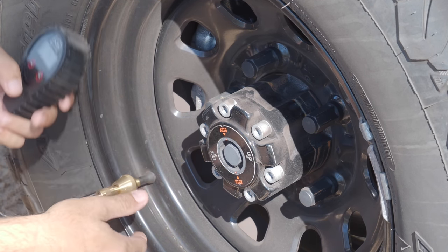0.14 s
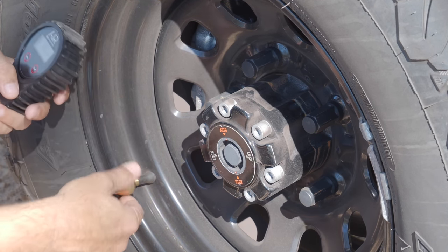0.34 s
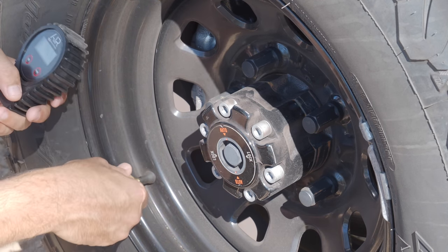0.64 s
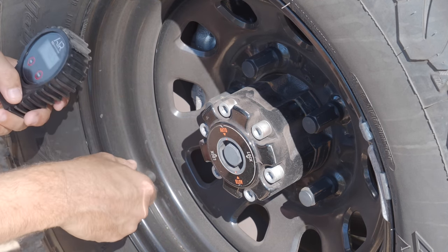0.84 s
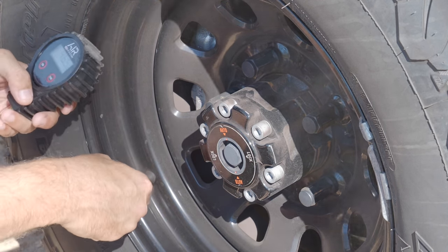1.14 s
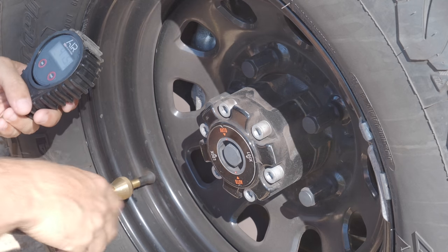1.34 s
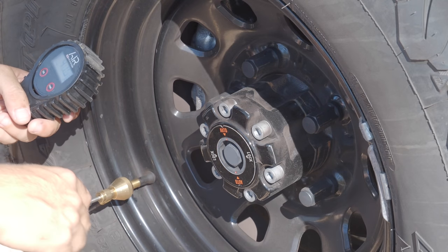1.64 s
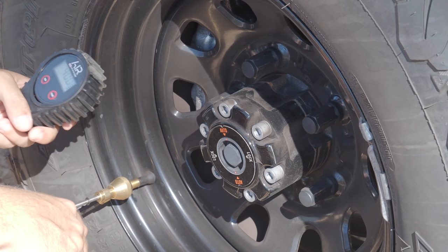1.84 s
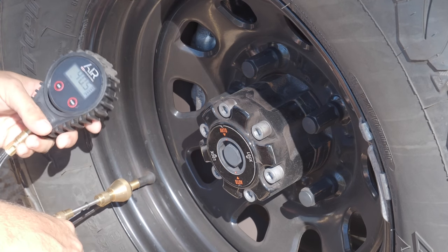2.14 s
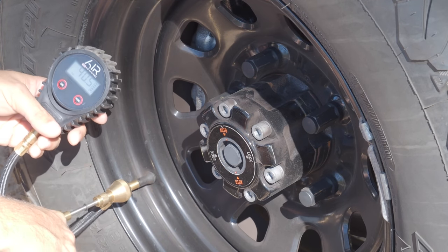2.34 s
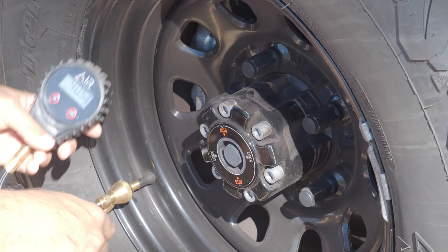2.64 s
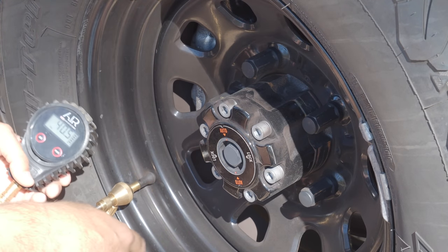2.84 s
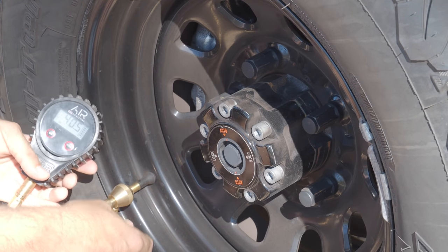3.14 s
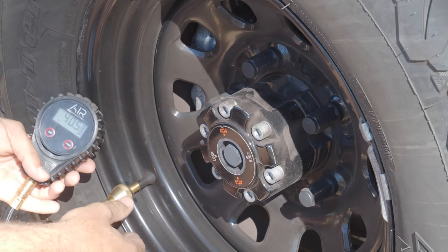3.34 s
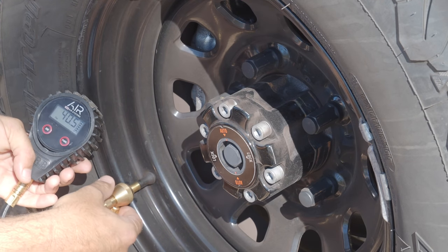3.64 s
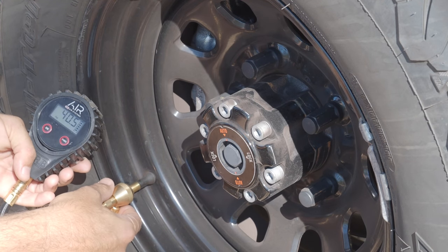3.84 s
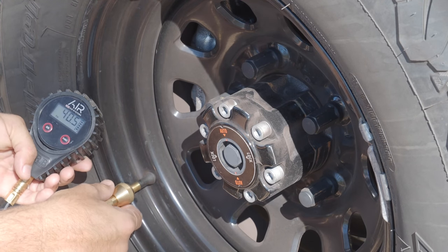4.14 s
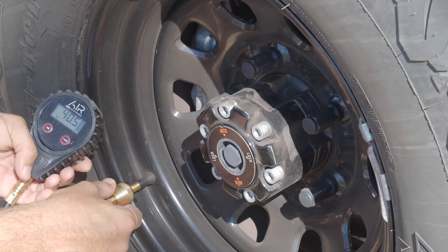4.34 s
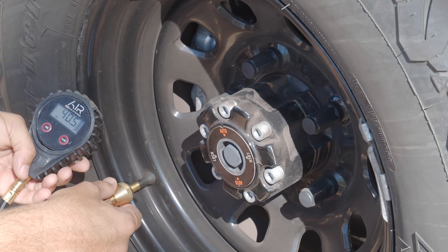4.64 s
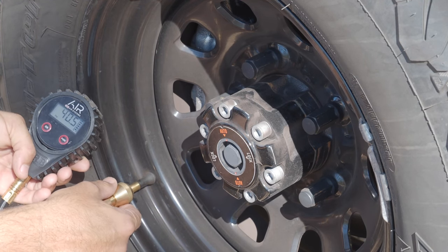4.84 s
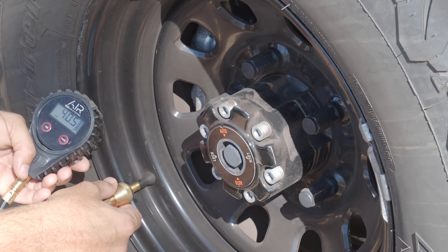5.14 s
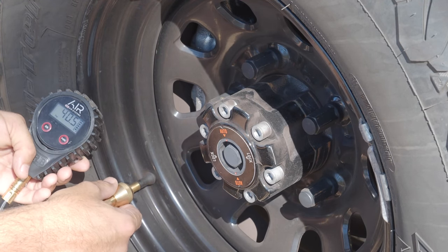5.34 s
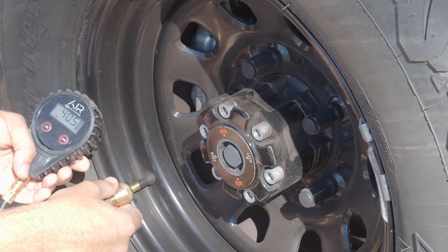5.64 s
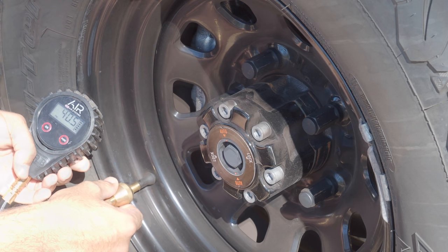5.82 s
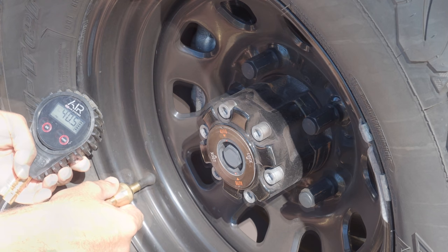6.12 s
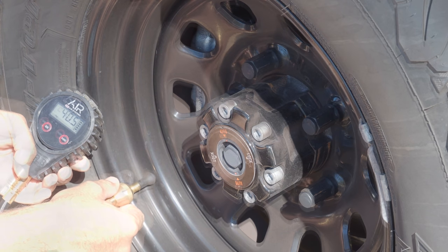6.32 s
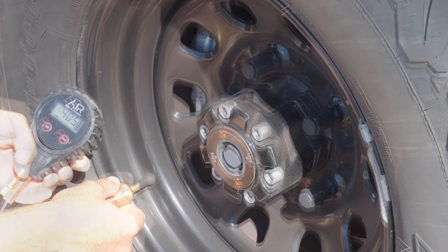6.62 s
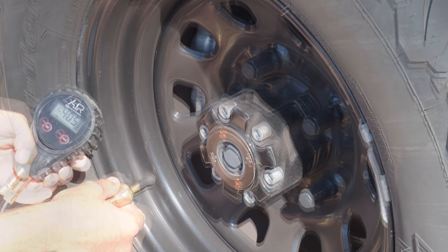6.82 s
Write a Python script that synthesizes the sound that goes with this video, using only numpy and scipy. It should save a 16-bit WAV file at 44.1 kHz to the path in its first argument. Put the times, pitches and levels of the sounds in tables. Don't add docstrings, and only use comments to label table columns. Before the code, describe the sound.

Fingers rub and click on a brass tyre valve fitting, then it pops open into a loud, steady, bright hiss of escaping air.

```python
import sys
import numpy as np
from scipy import signal
from scipy.io import wavfile
from scipy.ndimage import uniform_filter1d

SR = 44100
rng = np.random.default_rng(int(sys.argv[2]) if len(sys.argv) > 2 else 0)


def log_audio(samples):
    frames = np.atleast_2d(samples).T
    limited = np.clip(frames, -1, 1)
    pcm = np.round(limited * 32767).astype(np.int16)
    wavfile.write(sys.argv[1], SR, pcm)


def gain_from_db(level_db):
    decades = np.asarray(level_db, float) / 20
    return 10 ** decades


N = 307818


def evened(x):
    return x / np.sqrt(np.mean(x ** 2) + 1e-20)


def smooth_noise(count, size, passes=1):
    x = rng.standard_normal(count)
    for _ in range(passes):
        x = uniform_filter1d(x, size)
    return evened(x)


def read(points, hz):
    f, level_db = np.transpose(points)
    return np.interp(np.log(hz + 1), np.log(f + 1), level_db)


def add(mix, s, sound):
    part = mix[round(s * SR):][:len(sound)]
    part += sound[:len(part)]


def noise(db_of, size):
    s = np.arange(4 * N // size + 5) * size / 4 / SR
    hz = np.fft.rfftfreq(size, 1 / SR)[:, None]
    real, imaginary = rng.standard_normal((len(s), len(hz), 2)).T
    spectra = (real + 1j * imaginary) * gain_from_db(db_of(hz, s))
    return evened(signal.istft(spectra, nperseg=size, noverlap=3 * size // 4)[1][:N])


def patches(hz, s, bins, frames):
    field = rng.standard_normal((len(s), len(hz))).T
    return evened(uniform_filter1d(uniform_filter1d(field, bins, 0), frames, 1))


# t/s, jet level/dB, shading by the fingers/dB
AIR_FLOW = [(.985, -17.5, 0), (1.01, -16, -5), (1.05, -16.5, 0), (1.09, -14.5, -1.5), (1.16, -16.5, 1),
            (1.23, -16, -4.5), (1.3, -15, -1.5), (1.93, -15, -1.2), (2.15, -15, -1), (3.2, -15, -0.2),
            (3.7, -16, 0.5), (3.98, -17, 0.5), (4.17, -16, 0), (4.97, -15.5, -1), (5.13, -17.5, -1.1),
            (5.4, -16.1, 0.4), (6.09, -16, -0.1), (6.98, -19, 0.6)]
OPEN_S = .9468


def jet():
    t = np.arange(N) / SR
    at, level_db, _ = np.transpose(AIR_FLOW)
    rise_s, pop_db, pop_s = .013, 4, 0.022
    flutter_db = 0.48 * smooth_noise(N, 40)
    opening = np.clip((t - OPEN_S) / rise_s, 0, 1) ** 0.7
    rush_db = pop_db * np.exp(-(np.maximum(t - OPEN_S, 0) / pop_s) ** 2 / 2)
    hiss = noise(jet_colour, size=512)
    hiss = hiss * opening * gain_from_db(flutter_db + rush_db + np.interp(t, at, level_db))
    echo_s, echo_db = 0.0012, -50
    return hiss + gain_from_db(echo_db) * np.roll(hiss, round(echo_s * SR))


# f/Hz, level per Hz/dB
FREE_JET = [(250, -24.5), (500, -22), (1000, -16.5), (2000, -9), (3200, -6.5), (5500, -3.5), (8000, 0.5),
            (11000, 1), (13500, -0.5), (15000, 0), (15800, -6)]
# f/Hz, width/Hz, level/dB
VENT_RESONANCES = [(470, 374, 6.5), (836, 87, 4.5), (2300, 870, 3.5), (3330, 160, 2.5), (3810, 800, 4.5),
                   (4450, 870, 9), (6270, 130, 4.5), (11700, 190, -2.5), (12810, 190, -1), (13770, 110, -3),
                   (14500, 210, -4.5), (14740, 170, 0), (15070, 950, 0.5)]
# f/Hz, width/Hz, level/dB in grips one, two, three, four
HAND_HOLLOWS = [(1277, 760, 13, 10, 9, 9.0), (5280, 1100, 3.5, 3, 0.6, 0.6),
                (5900, 340, 7.5, -0.5, 1.5, 3.2), (7670, 520, 4, -1.1, -2, -3.5),
                (8080, 670, 1.5, 3.5, 0.8, 4), (8860, 620, 0.5, -2.0, -3, -2.5),
                (9180, 380, 5, 5.3, 5, 3.0), (9550, 300, -4, -3.0, 7, 6), (9770, 470, -2.2, -2.3, -7.5, -7),
                (10380, 650, -4, -1, -0.2, 3.4), (10660, 460, -0.6, -3, -4.5, -5.5),
                (11300, 220, 2, -1.9, -1.9, 1), (13200, 330, 6, 3, -1, 4.0), (14000, 180, 2.8, 0, 2.5, 5)]
GRIP_CHANGES = [
    1.26,
    2.56,
    3.48,
]


def jet_colour(hz, s):
    move_s = 0.15
    moved = [np.clip((s - g) / move_s + .5, 0, 1) for g in GRIP_CHANGES]
    grips = -np.diff([np.ones_like(s), *moved, 0 * s], axis=0)
    resonances_db = lift(hz, VENT_RESONANCES) + lift(hz, HAND_HOLLOWS) @ grips
    steep = -3 * np.log2(np.maximum(250 / (hz + 1), 1))
    eddies = 0.49 * patches(hz, s, bins=6, frames=24) + 0.12 * patches(hz, s, bins=90, frames=3)
    surge = 0.26 * patches(hz, s, bins=60, frames=45)
    return read(FREE_JET, hz) + steep + resonances_db + shading(hz, s) + eddies + surge


def lift(hz, rows):
    rows = np.array(rows)
    centre, width = rows[:, 0], rows[:, 1]
    return (1 / (1 + (2 * (hz - centre) / width) ** 2)) @ rows[:, 2:]


def shading(hz, s):
    at, level_db, shade_db = np.transpose(AIR_FLOW)
    sag_db = 3 * np.maximum(at - 5.6, 0)
    swing_db = level_db + 15.5 + sag_db

    def region(offset_db, shaded, resists):
        return np.interp(s, at, offset_db + shaded * shade_db - resists * swing_db)

    low = region(-1.6, 0.48, 0.58) / (1 + (hz / 2800) ** 6)
    vent = region(-.1, .95, 0.18) / (1 + abs((hz - 4300) / 800) ** 4)
    palm = region(-1, .45, 0.12) / (1 + abs((hz - 7000) / 1900) ** 4)
    return low + vent + palm


# f/Hz, level per Hz/dB
SKIN_COLOUR = [(470, -32), (800, -10), (2470, -9), (2660, -9), (5140, -10), (6040, -9), (7010, -10),
               (15500, -13)]
# middle t/s, half length/s, level/dB, top f/Hz
STROKES = [(.1, .04, -66, 5000), (.15, 0.06, -57, 6000), (.22, .05, -63, 5000), (.3, 0.088, -64, 5000),
           (.367, 0.033, -55, 7000), (.455, 0.019, -58, 7000), (.54, 0.04, -57, 12000),
           (.598, 0.027, -59, 12000), (.73, 0.055, -54, 5000), (.79, 0.044, -62, 9000),
           (.87, 0.052, -58, 10000), (.9, .05, -63, 4000), (.93, .03, -56, 10000)]


def rubs():
    out = np.zeros(N)
    skin = noise(lambda hz, s: read(SKIN_COLOUR, hz) + 0 * s, size=256)
    grain = rng.standard_normal(N)
    grain = evened(uniform_filter1d(uniform_filter1d(grain, size=70), size=40))
    skin *= gain_from_db(3.4 * grain)
    for s, half_s, db, top_hz in STROKES:
        part = skin[round((s - half_s) * SR):round((s + half_s) * SR)]
        four_poles = np.poly(4 * [np.exp(-2 * np.pi * top_hz / SR)])
        dulled = signal.lfilter([1], four_poles, part)
        add(out, s - half_s, gain_from_db(db) * evened(dulled + 1e-9) * np.hanning(len(part)))
    return out


# t/s, peak level/dB, centre f/Hz
THREAD_CLICKS = [(0.1898, -47, 6400), (0.362, -46, 4500), (0.447, -40, 6500), (0.545, -46, 6000),
                 (0.4505, -50, 5700), (0.5856, -44, 7400), (0.5939, -51, 6200), (0.6545, -44, 9600),
                 (0.6608, -51, 7900), (0.6776, -34, 8050), (0.6906, -36, 6500), (0.7056, -32, 2200),
                 (0.723, -39, 5600), (0.7385, -51, 3600), (0.7467, -42, 9300), (0.7546, -48, 9300),
                 (0.7625, -39, 9600), (0.778, -40, 9100), (0.7866, -39, 8500), (0.7892, -31, 8000),
                 (0.8018, -45, 9000), (0.8044, -41, 8400), (0.8135, -49, 6800), (0.8461, -49, 5000),
                 (0.8716, -38, 9700), (0.9223, -46, 5000)]


def clicks():
    out, u = np.zeros(N), np.arange(5000) / SR
    snap_decay = gain_from_db(np.maximum(-90000 * u, -200))
    rattle_decay = gain_from_db(np.maximum(-14 - 7500 * u, -200))
    for s, db, hz in THREAD_CLICKS:
        turn = 2 * np.pi * hz * u
        rough = uniform_filter1d(rng.standard_normal(len(u)), size=5)
        rattle = 3 * rattle_decay * rough * np.sin(turn)
        add(out, s, gain_from_db(db) * (snap_decay * np.cos(turn) + rattle))
    return out


# t/s, peak level/dB, f/Hz, t60/s
BRASS_KNOCKS = [(.6906, -33, 1600, .007), (.7056, -28, 2300, .005), (.7056, -28, 1700, .006),
                (.7056, -36, 3300, .004), (.7056, -43, 1100, .01), (.936, -28, 765, 0.021),
                (.937, -35, 1250, 0.02), (.945, -21, 130, .035), (.951, -26, 350, .02),
                (.96, -16, 470, 0.033), (.961, -17, 160, 0.024)]


def knocks():
    out, u = np.zeros(N), np.arange(5000) / SR
    for s, db, hz, t60 in BRASS_KNOCKS:
        decay = gain_from_db(db - 60 * u / max(t60, .004))
        onset = 1 - np.exp(-u * hz)
        add(out, s, decay * onset * np.sin(2 * np.pi * hz * u))
    return out


# t/s, firing rate f/Hz, effort level/dB
ENGINE = [(0, 41.3, -42.5), (.45, 37.56, -45.5), (.82, 47.8, -42.5), (1.0, 51, -50.5), (1.3, 58.7, -59),
          (1.61, 65.8, -52.5), (1.86, 69, -58), (2.14, 54.8, -59), (2.66, 40.7, -64), (2.78, 41.6, -56),
          (4.08, 55.8, -58.5), (4.9, 70.5, -50), (5.78, 85.8, -48), (5.93, 81, -62), (6.17, 69.4, -62),
          (6.3, 65, -55), (6.5, 57.4, -63), (6.98, 55, -60)]
# f/Hz, level/dB
PIPE = [(35, -22), (55, -1.5), (80, 1.5), (120, -5.5), (160, -13.5), (200, -20), (260, -61)]


def car():
    t, slow = np.arange(N) / SR, np.arange(0, N + 256, 256) / SR
    s, *columns = np.transpose(ENGINE)
    hz, effort_db = (np.interp(slow, s, c) for c in columns)
    slowing = uniform_filter1d(-np.gradient(hz, slow), size=10)
    coast_from, coast_full = 9, 34
    coasting = np.clip((slowing - coast_from) / (coast_full - coast_from), 0, 1)
    overtones_db = 0.5 + 0.1218 * (hz - hz[0]) - 10 * coasting
    turns = np.cumsum(np.interp(t, slow, hz)) / SR
    out = np.zeros(N)
    for k in range(1, 7):
        waver_db = .7 * smooth_noise(len(slow), 20, passes=2)
        db = effort_db + read(PIPE, k * hz) + overtones_db * (k > 1) + waver_db
        tone = np.sin(2 * np.pi * (k * turns + rng.random()))
        out += np.sqrt(2) * np.interp(t, slow, gain_from_db(db)) * tone
    return out


# f/Hz, level per Hz/dB
ROAD_COLOUR = [(15, -30), (30, -8), (64, 13), (130, 14.5), (200, 3), (270, -6), (510, -4.5), (830, 2),
               (1410, -7.5), (3170, -17.5), (4620, -13), (5500, -19), (15500, -27)]


def road():
    wash = noise(lambda hz, s: read(ROAD_COLOUR, hz) + 0.55 * patches(hz, s, bins=8, frames=12), size=1024)
    duck_db = -7 * np.clip((np.arange(N) / SR - OPEN_S) / 0.051, 0, 1)
    return gain_from_db(-51 + duck_db) * wash


def scene():
    return np.tile(jet() + rubs() + clicks() + knocks() + car() + road(), (2, 1))


# t/s, number of bands
STRAY_BANDS = [(1.012, 3), (1.174, 1), (1.244, 3), (1.314, 1), (1.476, 4), (1.848, 3), (2.08, 1), (2.15, 2),
               (2.173, 1), (2.312, 1), (2.335, 1), (2.428, 1), (2.684, 2), (2.73, 1), (3.171, 1),
               (3.543, 2), (3.612, 2), (3.868, 2), (4.1, 1), (4.657, 1), (5.122, 1), (5.47, 2), (5.633, 2),
               (5.795, 2), (6.329, 2), (6.747, 1), (6.817, 1), (6.91, 1), (6.979, 2)]


def stray_bands(x):
    half, offset = 1024, 587
    x = np.pad(x, ((0, 0), (0, 2 * half)))
    kaiser = np.kaiser(half + 1, 4 * np.pi)
    window = np.sqrt(np.cumsum(kaiser)[:-1] / kaiser.sum())
    turn = np.pi / half * np.outer(np.arange(half) + .5, np.arange(2 * half) + .5 + half / 2)
    lapped = np.r_[window, window[::-1]] * np.sqrt(2 / half) * np.cos(turn)
    edges_hz = np.linspace(4130, 15850, 9)
    edges = np.round(edges_hz * 2 * half / SR).astype(int)
    for s, bands in STRAY_BANDS:
        start = offset + half * round((s * SR - offset) / half - 1)
        span = slice(start, start + 2 * half)
        for k in rng.permutation(len(edges) - 1)[:bands]:
            band = lapped[edges[k]:edges[k + 1]]
            old = x[:, span] @ band.T
            new = old.std() * rng.standard_normal(old.shape)
            x[:, span] += (new - old) @ band
    return x[:, :N]


def top_cut(x):
    return signal.sosfilt(signal.butter(12, 16740, fs=SR, output="sos"), x)


def record(dry):
    low_pass = signal.firwin(3071, 15790, window=("kaiser", 9), fs=SR)
    mix = stray_bands(signal.oaconvolve(dry, low_pass[None], "same"))
    return top_cut(mix)


dry = scene()
out = record(dry)
log_audio(out)
```